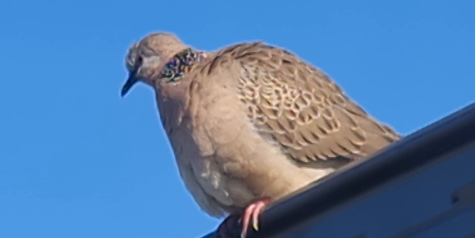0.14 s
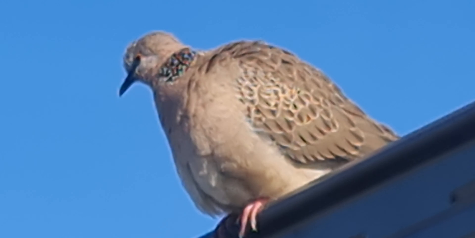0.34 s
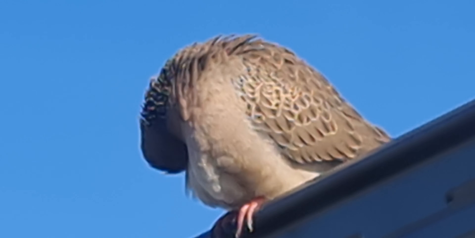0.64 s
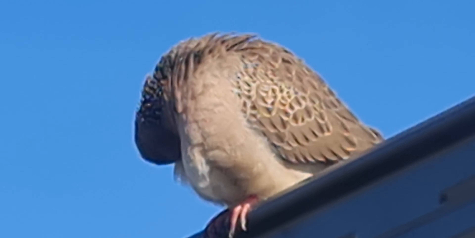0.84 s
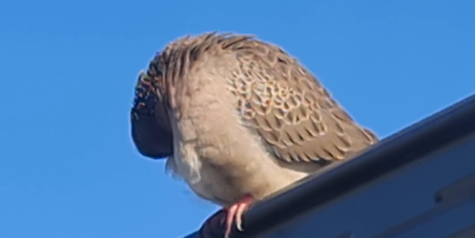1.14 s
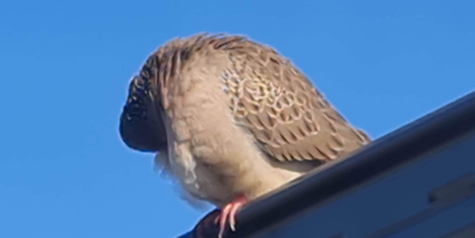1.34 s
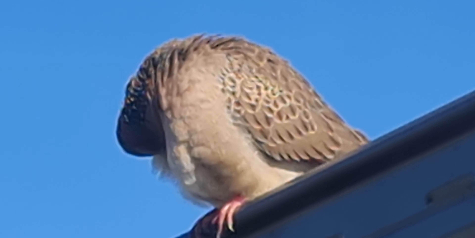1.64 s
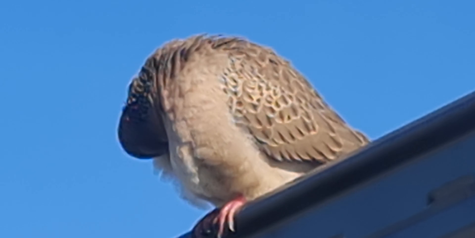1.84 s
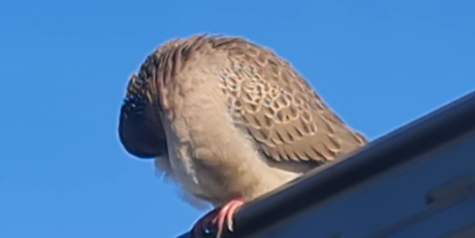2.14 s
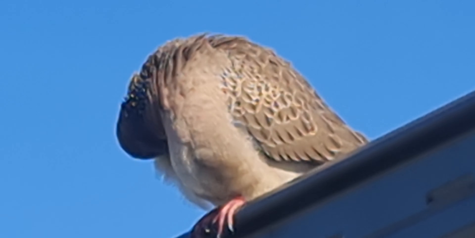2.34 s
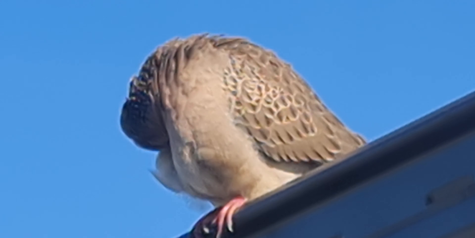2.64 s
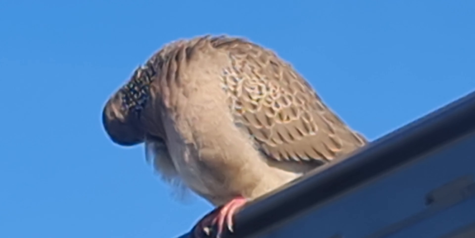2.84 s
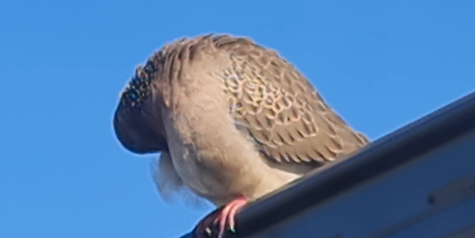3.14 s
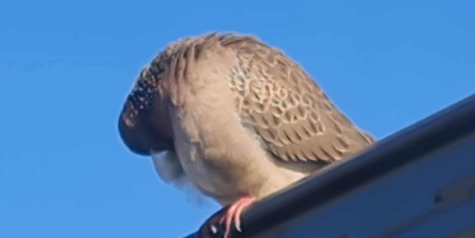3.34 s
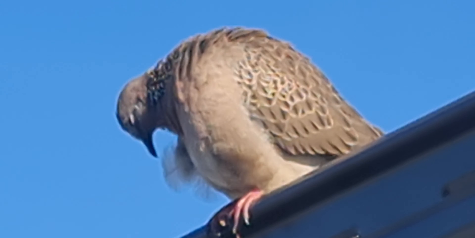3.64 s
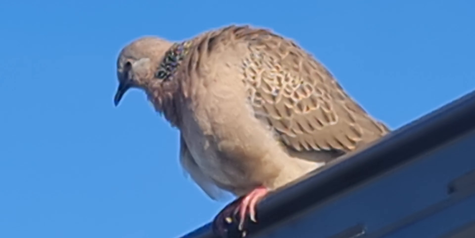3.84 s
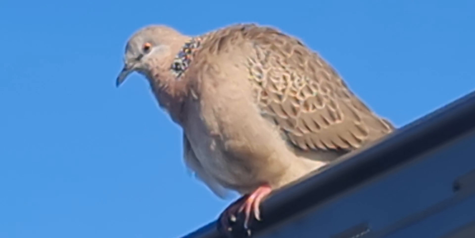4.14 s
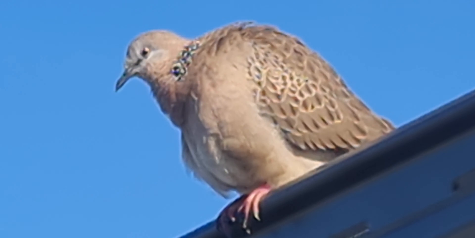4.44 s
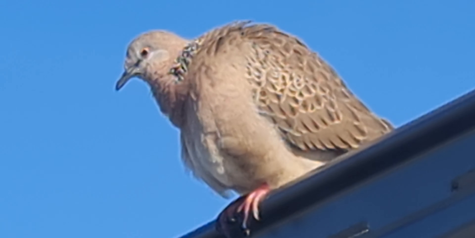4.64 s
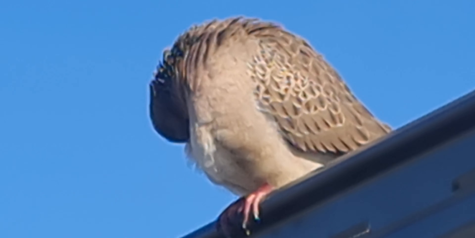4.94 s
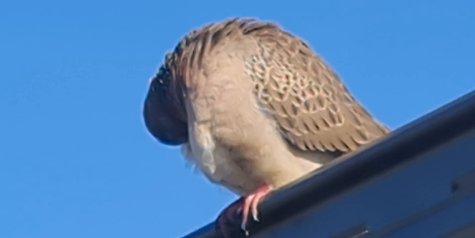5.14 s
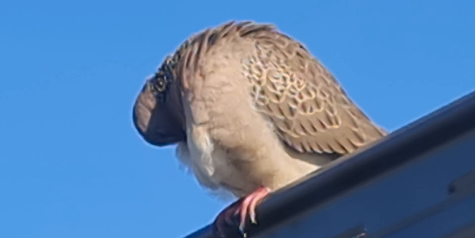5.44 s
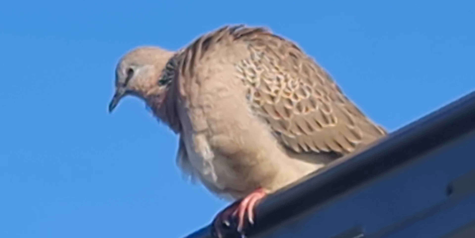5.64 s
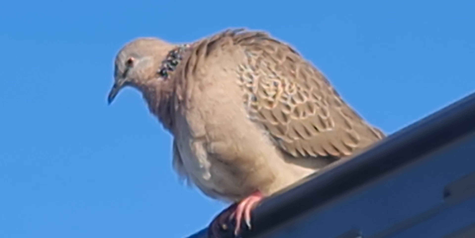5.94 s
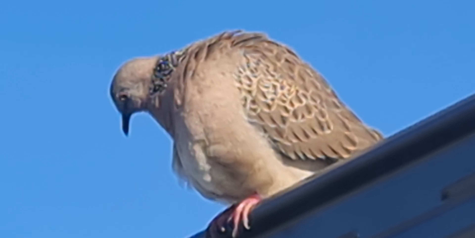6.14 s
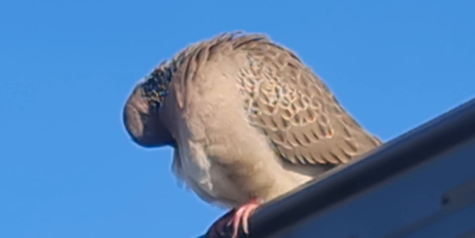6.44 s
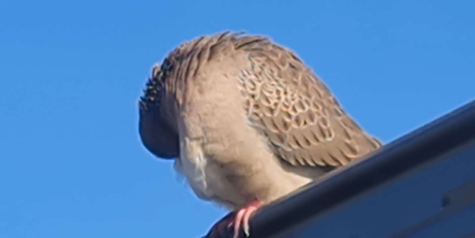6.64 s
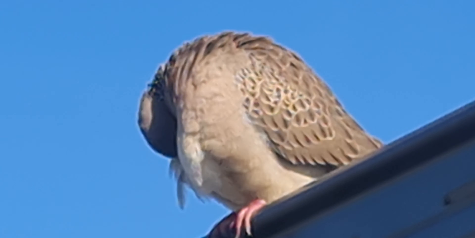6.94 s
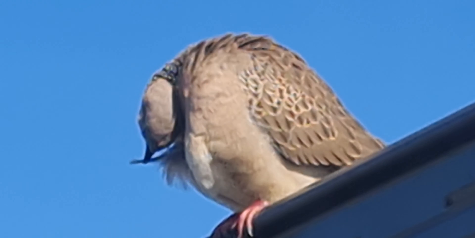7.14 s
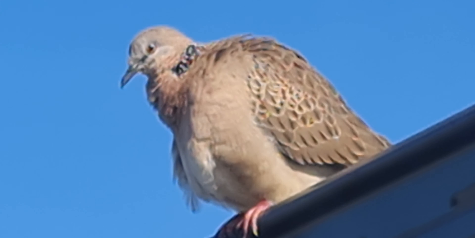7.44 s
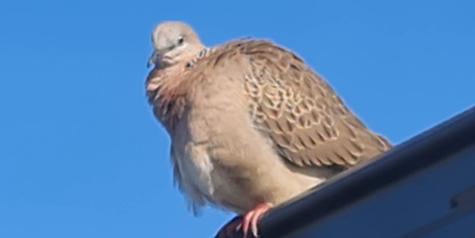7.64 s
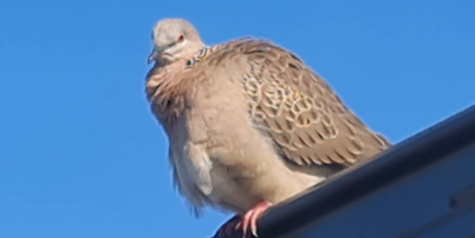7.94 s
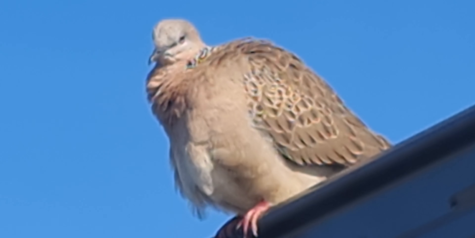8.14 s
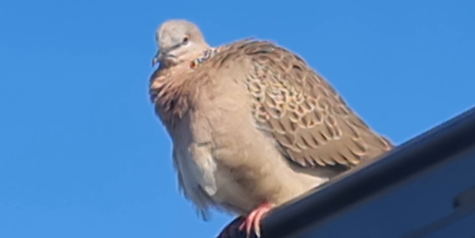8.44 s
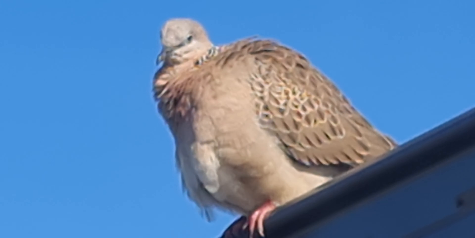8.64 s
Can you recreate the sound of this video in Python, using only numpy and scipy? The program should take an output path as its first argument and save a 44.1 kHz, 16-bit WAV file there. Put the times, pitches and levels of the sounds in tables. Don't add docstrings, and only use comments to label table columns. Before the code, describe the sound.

A dove close to the microphone opens with a low rolled coo from 0 to 0.65 s, a smooth tone rapidly chopped into a purr and gently falling. A bright chirrup follows at 0.65 s, a softer one at 1.6 s, with faint echoing whistles and buzzes over traffic rumble. At 2.4 s the ambience cuts abruptly with a tiny click; rising warbled calls sound at 2.4, 3.2 and 3.9 s, around a short coo at 2.8, a louder arched coo at 2.96 and a long roll from 3.3 to 3.9. Another click at 4.1 s brings more hiss, rough distant buzzes and a falling swoop at 4.9. The coo phrase returns from 5.3 to 6.4; far whistles and upward-flicking twitters run 6.1-7.4, then falling buzzes. A third phrase starts at 8.35 and stops abruptly near 8.8. Low engine hum and town noise continue throughout.

```python
import sys
import numpy as np
from scipy import signal
from scipy.io import wavfile
from scipy.ndimage import uniform_filter1d, minimum_filter1d

SR = 44100
rng = np.random.default_rng(int(sys.argv[2]) if len(sys.argv) > 2 else 0)


def makeup_ratio(level_db):
    decades = np.asarray(level_db, float) / 20
    return 10 ** decades


def put_to_file(sound):
    columns = np.atleast_2d(sound).T
    safe = np.clip(columns, -1, 1)
    whole_steps = np.round(safe * 32767)
    wavfile.write(sys.argv[1], SR, whole_steps.astype(np.int16))


N = 387638


def rms_one(x):
    return x / np.sqrt(np.mean(x ** 2) + 1e-20)


def drift(rate_hz):
    pole = np.exp(-80 * np.pi * rate_hz / SR)
    noise = rng.standard_normal(N // 40 + 2002)
    slow = signal.lfilter([1], [1, -2 * pole, pole * pole], noise)[2000:]
    return np.interp(np.arange(N) / 40, np.arange(len(slow)), rms_one(slow))


def add(out, start_s, sound):
    i = round(start_s * SR)
    out[i:i + len(sound)] += sound[:N - i]


def tone(hz, level_db, edge):
    envelope = np.sqrt(2) * makeup_ratio(level_db) * signal.windows.tukey(len(hz), np.clip(edge, 0, 1))
    return envelope * np.sin(2 * np.pi * np.cumsum(hz) / SR)


def glide(length_s, first_hz, middle_hz, last_hz):
    curve = np.polyfit([0, .5, 1], [first_hz, middle_hz, last_hz], 2)
    return np.polyval(curve, np.linspace(0, 1, round(length_s * SR)))


def shaped(shape):
    s, hz, level_db = np.transpose(shape)
    t = np.arange(round(s[-1] * SR)) / SR
    return [uniform_filter1d(np.interp(t, s, column), size=len(t) // 30) for column in (hz, level_db)]


def band_noise(noise, order, low_hz, high_hz):
    return signal.sosfilt(signal.butter(order, [low_hz, high_hz], "band", fs=SR, output="sos"), noise)


# shape, start in seconds, length in seconds, effort in dB.
COOS = [
    ("roll", .04, .615, 0.1),
    ("short", 2.808, .14, 0.1),
    ("arch", 2.96, .237, 0.1),
    ("roll", 3.333, .605, 0.13),
    ("short", 5.333, .135, 0.1),
    ("arch", 5.475, .255, 0.1),
    ("roll", 5.862, .58, 0.1),
    ("short", 8.355, .14, 0.1),
    ("arch", 8.5, .255, 0.13),
]
# share of the length, pitch in Hz, level in dB.
SHORT = [(0, 433, -34.5), (.08, 521.5, -19.5), (.27, 618, -14.5), (.45, 578, -13.5), (.56, 545, -24.5),
         (.68, 478, -22), (.76, 520, -41), (.85, 510, -32.5), (1, 490, -31)]
ARCH = [(0, 494.2, -26.5), (.25, 529, -20), (.4, 611.4, -11.5), (.52, 730.3, -8.5), (.65, 732.5, -9.5),
        (.78, 722.4, -9.5), (.86, 690.4, -4.5), (.91, 619, -14), (.96, 518, -20), (1, 431, -39.5)]
ROLL = [(0, 473, -25), (.02, 560.7, -18.5), (.06, 684, -11), (.2, 689.3, -12), (.45, 659.6, -10.5),
        (.9, 579.6, -15), (.955, 558, -14.5), (.975, 491, -22.5), (1, 430, -35)]


def dove():
    close_s, open_s, sweep_hz = .0033, .004, 90
    out, roll_db, sweep = np.zeros(N), np.zeros(N), np.zeros(N)
    near = np.arange(-600, 1200) / SR
    dip = np.exp(-(near / np.where(near < 0, close_s, open_s)) ** 2)
    rows = shuts()
    follows = [s for s, *rest in rows[1:]] + [N / SR]
    slips = rng.normal(0, 1, len(rows))
    for (s, depth_db, pulse_db), after, slip in zip(rows, follows, slips):
        add(roll_db, s + near[0], -depth_db * dip)
        pulse = np.linspace(-1, 1, round(min(after - s, .025) * SR))
        add(roll_db, s, pulse_db * (1 - pulse ** 4))
        bend = .45 * pulse - 2.3 * np.exp(-(pulse + 1) / .33) + 1.3 * np.exp((pulse - 1) / .25)
        add(sweep, s, np.clip(depth_db / 12, 0, 1) * (bend - np.median(bend) + .08 * slip))
    sweep = uniform_filter1d(sweep, size=90)
    roll_db = roll_db + .9 * drift(40)
    contours = {"short": SHORT, "arch": ARCH, "roll": ROLL}
    for shape, s, length_s, effort_db in COOS:
        share, hz, level_db = np.transpose(contours[shape])
        along = np.linspace(0, 1, round(length_s * SR))
        span = slice(round(s * SR), round(s * SR) + len(along))
        calm = 1 - .75 * along ** 3
        pitch = uniform_filter1d(np.interp(along, share, hz), size=400) + sweep_hz * calm * sweep[span]
        level_db = np.interp(along, share, level_db) + roll_db[span] + effort_db
        add(out, s, tone(pitch, level_db, 0.027))
    return out


# share of the closures, gap in seconds, depth in dB, time scatter in seconds.
ROLL_SHUTS = [(0, .022, 13, .001), (.14, .02, 14, .0015), (.4, .014, 13, .0025), (.68, .0145, 12, .004),
              (.8, .021, 11, .003), (1, .02, 4.5, .002)]
ARCH_SHUTS = [(0, .012, 15, .002), (.5, .014, 10, .002), (.75, .013, 4, .002), (1, .013, 1.5, .002)]


def shuts():
    depth_scatter, pulse_db, pulse_scatter_db = .35, 1.2, 1.3
    rows = []
    for shape, s, length_s, effort_db in COOS:
        if shape == "short":
            continue
        table, count = (ROLL_SHUTS, 30) if shape == "roll" else (ARCH_SHUTS, 10)
        share, *rules = np.transpose(table)
        luck = rng.standard_normal((count, 3))
        along = np.linspace(0, 1, count)
        gap_s, depth_db, scatter_s = [np.interp(along, share, rule) for rule in rules]
        times = s + np.sort(np.cumsum(gap_s) + scatter_s * luck[:, 0])
        depths_db = depth_db * np.exp(depth_scatter * luck[:, 1])
        rows += zip(times, depths_db, pulse_db + pulse_scatter_db * luck[:, 2])
    return rows


# time in seconds, pitch in Hz, level in dB.
CHIRRUP = [(0, 3300, -10), (.012, 4150, -4), (.03, 3900, 0), (.046, 3780, -4), (.049, 2600, -22),
           (.056, 3100, -9), (.07, 3960, -7), (.088, 3200, -9), (.104, 2450, -14)]
# start in seconds, level in dB.
CHIRRUPS_AT = [
    (.666, -28),
    (1.59, -36.5),
]


def chirrups():
    out = np.zeros(N)
    pitch, shape_db = shaped(CHIRRUP)
    for s, level_db in CHIRRUPS_AT:
        stroke_db = level_db + shape_db
        add(out, s, tone(pitch, stroke_db, .1) + tone(2 * pitch, stroke_db - 24, .1))
        rise_hz = 4800 + 3000 * np.linspace(0, 1, round(.042 * SR)) ** 3
        ragged = uniform_filter1d(rng.standard_normal(4000), size=30)[:len(rise_hz)]
        add(out, s - .03, tone(rise_hz * (1 + 0.7 * ragged), level_db - 17, 0.2))
    return out * makeup_ratio(5.4 * drift(93.8))


# time in seconds, pitch in Hz, level in dB.
LILT = [(0, 2250, -1.5), (.04, 2660, -3), (.095, 2800, -2.5), (.2, 2520, -1), (.39, 2080, -1)]
UPSWEEP = [(0, 2850, -12), (.05, 3420, -6), (.075, 3600, 1), (.1, 4170, -4.5), (.125, 4240, -6.5)]
# start in seconds, level in dB.
LILTS = [
    (.455, -51.5),
    (1.968, -49.5),
]
# start in seconds, level in dB, reach of the rise from 0 to 1.
UPSWEEPS = [
    (2.378, -39.5, 1),
    (3.185, -41.5, 0.99),
    (3.87, -38.5, .86),
]
# start in seconds, length in seconds, first pitch in Hz, last pitch in Hz, level in dB.
NOTES = [(0.802, 0.28, 4170, 4290, -59.5), (1.255, 0.015, 2890, 2310, -52.5),
         (1.328, 0.076, 1750, 2130, -56.5), (1.4, 0.2, 2126, 2166, -59), (1.75, 0.077, 1818, 1745, -53.5),
         (3.756, 0.11, 5600, 5520, -64), (4.078, 0.046, 4860, 4880, -64), (4.116, 0.66, 3470, 3284, -54.5),
         (5.6, 0.076, 2170, 2110, -58.5), (5.717, 0.099, 1910, 2010, -55.5),
         (6.183, 0.16, 2100, 1900, -51.5), (6.2, 0.12, 2394, 2460, -56.5), (6.376, .23, 2523, 2435, -55.5),
         (6.622, 0.055, 2144, 2120, -44), (6.729, 0.08, 2050, 1887, -48.5),
         (6.622, 0.55, 2463, 2465, -58.5), (7.151, 0.12, 2130, 2035, -61), (7.303, .21, 1730, 1947, -55.5),
         (7.388, 0.12, 2260, 2280, -56.5), (7.494, 0.22, 2066, 2280, -53), (7.5, .11, 2810, 2860, -54),
         (7.694, 0.13, 2740, 2530, -48.5), (7.823, 0.21, 2690, 2720, -58), (8.25, 0.26, 3170, 3160, -55.5)]


def clear_songs(waver, flutter, warble):
    songs = [(s, *shaped(LILT), db, 0) for s, db in LILTS]
    hz, rise_db = shaped(UPSWEEP)
    for s, db, reach in UPSWEEPS:
        songs.append((s, hz[0] + reach * (hz - hz[0]), rise_db, db, .07))
    for s, length_s, first_hz, last_hz, db in NOTES:
        songs.append((s, np.linspace(first_hz, last_hz, round(length_s * SR)), 0, db, 0))
    out = np.zeros(N)
    for s, pitch, shape_db, level_db, swing in songs:
        here = round(s * SR) + np.arange(len(pitch))
        rising = np.linspace(0, 1, len(pitch)) ** 2
        unsteady = 1 + .008 * waver[here] + swing * rising * warble[here]
        add(out, s, tone(pitch * unsteady, level_db + shape_db + 3.0 * flutter[here], 0.073))
    return out


# start in seconds, length in seconds, first pitch in Hz, last pitch in Hz, level in dB.
THIN_BUZZES = [
    (.05, 0.39, 5020, 5300, -58.5),
    (.42, .2, 5350, 5270, -62.5),
    (3.13, 0.051, 5850, 5500, -54.5),
    (3.328, 0.42, 5600, 5700, -63),
    (8.51, .34, 4960, 4940, -58.5),
    (8.5, .34, 5900, 5850, -60),
]
ROUGH_BUZZES = [
    (4.09, .49, 3420, 3250, -43.5),
    (4.51, .2, 4150, 2450, -39.5),
    (.71, .045, 6300, 6500, -55),
]
WIDE_BUZZES = [
    (1.66, .15, 7200, 7060, -60),
    (4.07, .07, 5650, 5570, -50),
    (4.1, .47, 3507, 3410, -46.5),
    (4.69, .22, 3290, 3000, -46.5),
    (4.73, .1, 6330, 6450, -58.5),
    (8.5, .34, 5290, 5300, -57),
    (7.61, .29, 3390, 2967, -46.5),
    (7.9, .32, 6300, 6200, -54.5),
    (7.95, 0.37, 3680, 3610, -50.5),
    (8.19, .44, 3790, 3636, -46.5),
]


def buzzes(warble):
    out = np.zeros(N)
    slow = drift(7.3)
    swings = (.03, THIN_BUZZES), (0.11, ROUGH_BUZZES), (0.18, WIDE_BUZZES)
    for swing, rows in swings:
        for s, length_s, first_hz, last_hz, level_db in rows:
            centre = np.geomspace(first_hz, last_hz, round(length_s * SR))
            here = np.minimum(round(s * SR) + np.arange(len(centre)), N - 1)
            fading_db = np.linspace(-1.5, 3, len(centre))
            add(out, s, tone(centre * (1 + swing * warble[here]), level_db - fading_db + 2.0 * slow[here], .45))
    return out


# time in seconds, pitch in Hz, level in dB.
SWOOP = [(0, 5170, -1.5), (.05, 4840, -1.5), (.11, 3900, 4.2), (.2, 3450, 2), (.3, 2994, -1.5),
         (.38, 2800, -10)]
# start in seconds, level in dB.
SWOOP_AT = (4.885, -42)


def swoop(warble):
    out = np.zeros(N)
    start_s, level_db = SWOOP_AT
    centre, shape_db = shaped(SWOOP)
    add(out, start_s, tone(centre * (1 + .125 * warble[:len(centre)]), level_db + shape_db, .1))
    return out


# start in seconds, level in dB.
FLICKS = [(6.1, -58.5), (6.22, -54), (6.33, -50), (6.45, -54), (6.55, -58), (6.67, -54.5), (6.76, -53.5),
          (6.81, -50.5), (6.86, -51), (6.95, -52.5), (7.05, -49), (7.14, -47.5), (7.24, -49), (7.33, -48.5),
          (7.98, -55)]


def flicks(warble):
    out = np.zeros(N)
    for s, level_db in FLICKS:
        pitch = glide(.045, 3300, 3650, 4150) * rng.uniform(.97, 1.03)
        add(out, s, tone(pitch * (1 + .05 * warble[round(s * SR):][:len(pitch)]), level_db, 0.45))
    return out


def songbirds():
    flutter, waver = drift(60), drift(45)
    warble_phase = 2 * np.pi * np.cumsum(140 + 40 * waver) / SR
    warble = signal.sawtooth(warble_phase, .25) + .35 * flutter
    voices = clear_songs(waver, flutter, warble) + buzzes(warble) + swoop(warble) + flicks(warble)
    return voices * makeup_ratio(1.1 * waver)


# start in seconds, centre in Hz, width in Hz, level in dB, 60 dB decay time in seconds.
FADING = [
    (0.0, 711, 60, -28, 0.76),
    (2.378, 5177, 79.4, -30.5, 0.71),
    (2.38, 5320, 220, -28, 0.53),
    (2.378, 5600, 200, -47.5, 0.6),
    (2.552, 5240, 247, -54.5, 3.3),
]


def fading_calls():
    out, t = np.zeros(N), np.arange(SR) / SR
    for s, hz, width_hz, level_db, t60 in FADING:
        ringing = band_noise(rng.standard_normal(2 * SR), 2, hz - width_hz / 2, hz + width_hz / 2)[SR:]
        add(out, s, makeup_ratio(level_db - 60 * t / t60) * rms_one(ringing))
    return out


# frequency in Hz, density in dB per Hz.
AIR = [(15, -36.5), (25, -8), (85, 3), (141, -3.5), (194, -4.5), (357, -9), (879, -1), (1920, -21.5),
       (3120, -24), (3710, -22), (4730, -27.5), (5340, -25.5), (5890, -29), (8490, -34), (11000, -74.5),
       (18700, -120)]
# time in seconds, level in dB.
TRAFFIC_SWELL = [(0.0, -42.5), (0.76, -39.5), (1.22, -46.5), (1.76, -41), (2.01, -46), (2.37, -42),
                 (2.94, -43), (3.87, -35.5), (4.06, -43), (4.68, -49.5), (5.29, -42.5), (5.48, -42),
                 (6.27, -43), (6.93, -43), (7.44, -46), (8.79, -39)]
# start in seconds, hum in dB, hiss in dB.
BACKGROUNDS = [
    (0, 2, 0.5),
    (2.38, .8, 0),
    (4.068, -0.05, 4),
]
# centre in Hz, width in Hz, level in dB.
ENGINE = [
    (72.6, 31, -44.5),
    (150, 3.5, -54.5),
]
# start in seconds, length in seconds, first, middle and last pitch in Hz, level in dB.
DRONE = (2, 1.53, 318, 316.5, 320.5, -46.5)


def traffic():
    s, db = np.transpose(TRAFFIC_SWELL)
    start, hum_db, hiss_db = np.transpose(BACKGROUNDS)
    air_hz, air_db = np.transpose(AIR)
    t = np.arange(N) / SR
    rumble_db = np.interp(t, s, db - np.mean(db))
    current = np.searchsorted(start[1:], t)
    hum_db = hum_db[current] + 0.17 * rumble_db
    hiss_db = hiss_db[current]
    edges_hz = 22 * 2 ** (np.arange(28) / 3)
    white, out = rng.standard_normal((2, N)), 0
    for k, (low, high) in enumerate(zip(edges_hz, edges_hz[1:])):
        hz = np.sqrt(low * high)
        if hz < 200:
            swell_db = rumble_db + 2.82 * drift(3)
        else:
            swell_db = hum_db if hz < 2500 else hiss_db
        colour_db = np.interp(np.log(hz), np.log(air_hz), air_db)
        band = band_noise(white[k % 2], 2, low, high)
        out = out + band * makeup_ratio(colour_db + swell_db + 1.3 * drift(5.1))
    out = makeup_ratio(-37.5) * rms_one(out)
    for hz, width_hz, level_db in ENGINE:
        order = rms_one(band_noise(rng.standard_normal(N), 1, hz - width_hz / 2, hz + width_hz / 2))
        out = out + makeup_ratio(level_db + rumble_db + 2.8 * drift(3.8)) * order
    start_s, length_s, first_hz, middle_hz, last_hz, level_db = DRONE
    add(out, start_s, tone(glide(length_s, first_hz, middle_hz, last_hz), level_db, 0.94))
    return out


def echoed(dry, near_db, near_t60, far_db, far_t60, wall_db):
    t = np.arange(2 * SR) / SR
    near, far = rng.standard_normal((2, len(t))) * (t > .012)
    near = near * makeup_ratio(-60 * t / near_t60)
    far = far * makeup_ratio(-60 * t / far_t60)
    tail = makeup_ratio(near_db) * near / np.linalg.norm(near) + makeup_ratio(far_db) * far / np.linalg.norm(far)
    add(tail, .03, makeup_ratio([wall_db]))
    cuts = [0] + [round(s * SR) for s, *click in SCENE_CHANGES[:2]] + [N]
    wet = [signal.fftconvolve(dry[a:b], tail)[:b - a] for a, b in zip(cuts, cuts[1:])]
    return dry + np.concatenate(wet)


def scene():
    close = echoed(dove(), -12.5, .32, -17.5, 2.0, wall_db=-19)
    nearer = echoed(chirrups(), -1.5, .3, -11, .8, wall_db=-12)
    distant = echoed(songbirds(), 0, .5, -5, 1.5, wall_db=-8)
    return (close + nearer + distant + fading_calls() + traffic())[None]


def thin_treble(x, from_hz, keep_db, mask_db, spread_db):
    hz, _, lines = signal.stft(x, SR, nperseg=2048)
    power = np.abs(lines) ** 2 + 1e-18
    band = np.abs(uniform_filter1d(power, size=17, axis=1)) + 1e-16
    held = uniform_filter1d(power / band, size=4, axis=2)
    weak = 1 / (1 + (held / makeup_ratio(2 * keep_db)) ** 4)
    slope = spread_db * hz[:, None] / 1000
    band_db = 10 * np.log10(band)
    loud_db = np.where(hz[:, None] > 3300, band_db, -200)
    hidden_db = np.maximum.accumulate(loud_db + slope, axis=1) - slope - mask_db
    hidden_db = signal.lfilter([.45], [1, -.55], hidden_db + 150, axis=2) - 150
    shown = 1 / (1 + makeup_ratio(12 * np.clip(hidden_db - band_db, -30, 30)))
    treble = np.clip((hz[:, None] - from_hz) / 2500, 0, 1)
    return signal.istft(lines * shown * (1 - .97 * treble * weak), SR, nperseg=2048)[1][:, :N]


# time in seconds, click level in dB, click decay in samples.
SCENE_CHANGES = [
    (2.378, -40, 4),
    (4.068, -33, .7),
    (8.788, -28, .7),
    (0.0, -38, .7),
]


def change_clicks():
    out = np.zeros(N)
    for s, click_db, length in SCENE_CHANGES:
        add(out, s, makeup_ratio(click_db) * np.exp(-np.arange(30) / length))
    return out


def low_pass(x):
    return signal.sosfilt(signal.butter(12, 15750, fs=SR, output="sos"), x)


def record(dry):
    peak = uniform_filter1d(-minimum_filter1d(-np.abs(dry), size=441), size=221)
    dry = dry / np.maximum(1, peak / .88)
    x = dry + 0.028 * dry ** 2 - 0.034 * dry ** 3
    x = x - uniform_filter1d(x, size=4000)
    x = thin_treble(x, from_hz=3500, keep_db=0, mask_db=16.5, spread_db=5.5)
    mix = signal.sosfilt(signal.ellip(10, .3, 60, 8570, fs=SR, output="sos"), x)
    hiss = rng.standard_normal((2, N))
    high_band = signal.ellip(5, .3, 50, [9200, 10600], "band", fs=SR, output="sos")
    mix = mix + makeup_ratio(-68.5) * signal.sosfilt(high_band, hiss[0]) + makeup_ratio(-86.0) * hiss[1]
    return low_pass(mix + change_clicks())


dry = scene()
out = record(dry)
put_to_file(out)
```